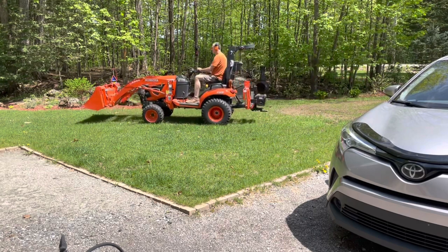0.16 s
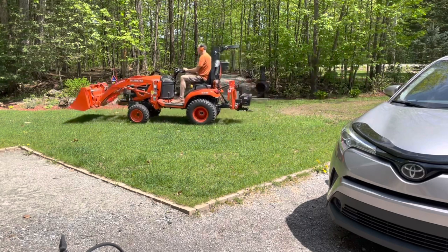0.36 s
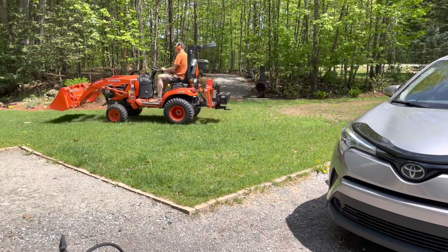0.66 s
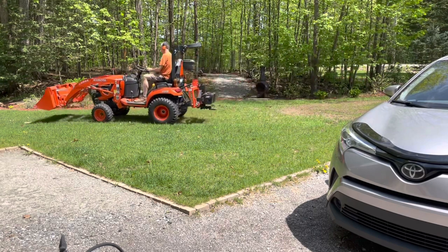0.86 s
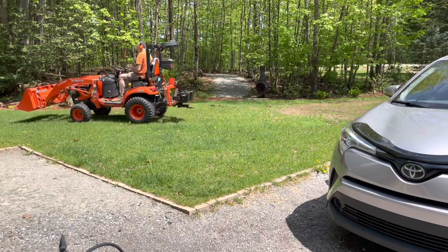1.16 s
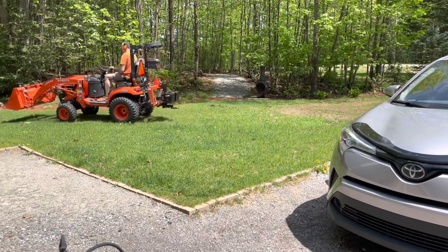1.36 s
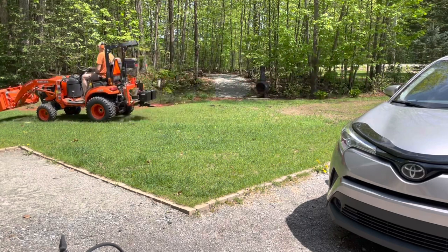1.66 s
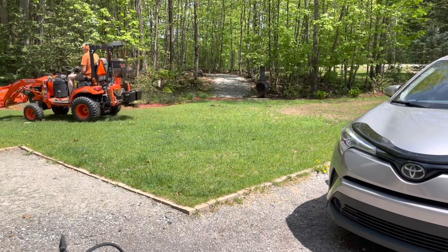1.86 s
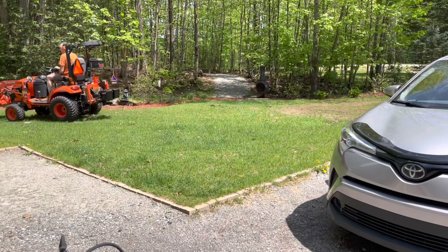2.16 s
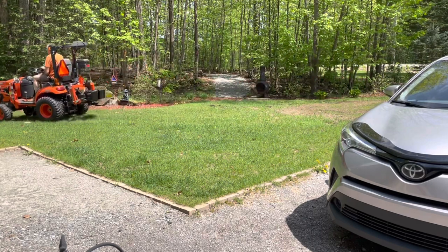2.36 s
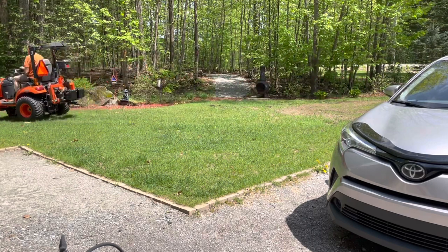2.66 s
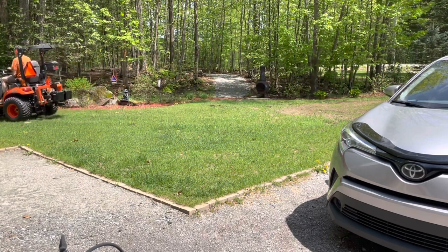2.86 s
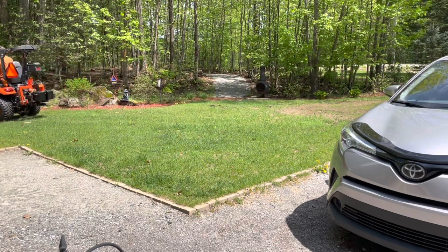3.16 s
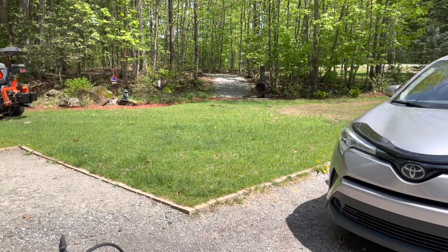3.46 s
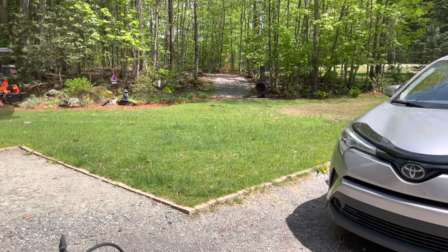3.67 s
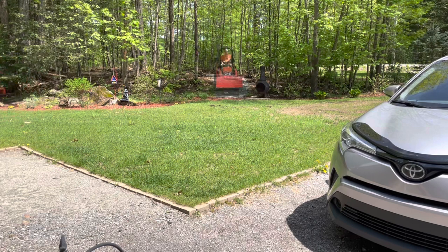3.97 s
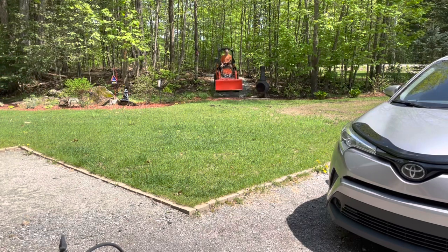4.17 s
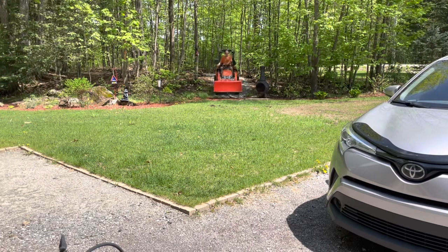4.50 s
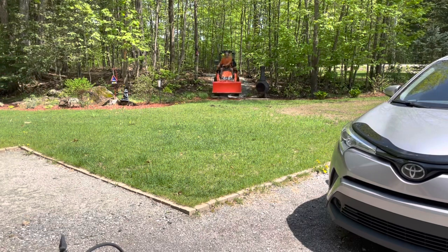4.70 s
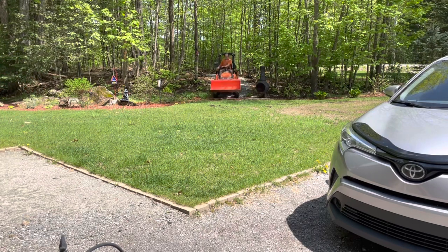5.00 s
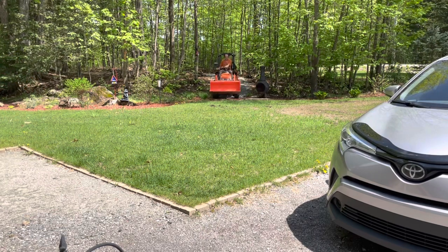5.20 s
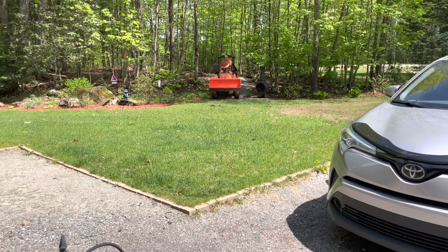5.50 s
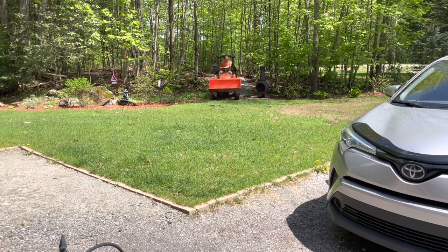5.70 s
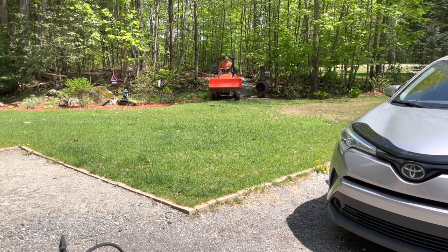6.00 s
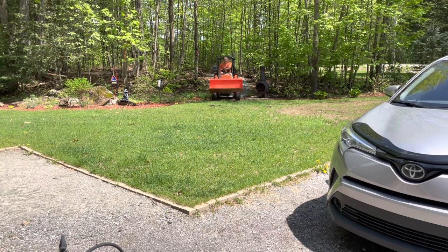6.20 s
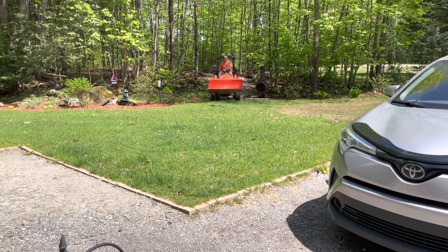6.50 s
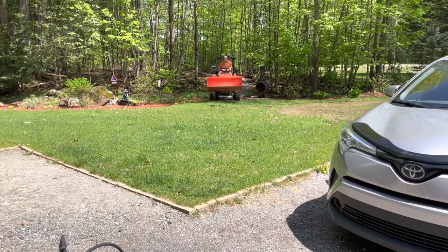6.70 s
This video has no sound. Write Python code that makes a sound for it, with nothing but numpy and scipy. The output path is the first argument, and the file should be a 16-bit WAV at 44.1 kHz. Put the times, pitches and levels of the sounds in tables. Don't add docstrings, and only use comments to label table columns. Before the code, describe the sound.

Outdoors on a lawn, a compact three-cylinder diesel tractor runs at a steady fast putter, with knocking combustion, airy fan rush and thin hydraulic and gear whines. It turns away and fades slightly, the whine becoming clearer. Around four seconds the sound cross-fades to the same engine facing the listener from farther away, duller and softer, with a couple of low linkage thumps. Stereo microphone at a fixed spot in the open air.

```python
import sys
import numpy as np
from scipy import signal
from scipy.fft import rfft, irfft, next_fast_len
from scipy.io import wavfile

SR = 44100
rng = np.random.default_rng(int(sys.argv[2]) if len(sys.argv) > 2 else 0)


def unload_wav(signal):
    wavfile.write(
        sys.argv[1],
        SR,
        np.round(np.clip(np.atleast_2d(signal).T, -1, 1) * 32767).astype(np.int16),
    )


def gain_from_db(level_db):
    decades = np.asarray(level_db, float) / 20
    return 10 ** decades


N = 302071
TIME_S = np.arange(N) / SR

# time_s, side_on_share, behind_share (remainder: afar)
VIEW = [(0, 1, 0), (1.1, 1, 0), (2.3, 0, 1), (3.65, 0, 1), (4.05, 0, 0), (6.85, 0, 0)]
# time_s, cycles_per_s
SPEED = [(0, 19.57), (.25, 19.55), (.5, 19.44), (1, 19.38), (1.25, 19.54), (1.5, 19.44), (2.25, 19.5),
         (2.5, 19.7), (2.75, 19.66), (3, 19.92), (3.25, 20), (3.75, 20), (3.95, 20.42), (4.55, 20.43),
         (4.75, 20.3), (5, 19.91), (5.25, 20.27), (5.5, 20.06), (6, 20.29), (6.25, 20.22), (6.5, 19.77),
         (6.85, 19.65)]
# time_s, level_db, load_db
NEARNESS = [(0, -34, 2.3), (.84, -35, 1.2), (1.22, -35, 1.1), (1.96, -33.5, 0.2), (2.27, -35, 0.9),
            (3.53, -37.5, -1.2), (3.93, -41, 1), (4.04, -37.5, 0.5), (4.3, -37, -0.5), (4.52, -37, 0),
            (4.58, -35.5, 0.5), (4.66, -38, 0.3), (5.4, -37, -3), (6.54, -37, -2.5), (6.85, -34.5, -3.5)]

# time_s, firing_beat_db, octave_over_beat_db
EXHAUST = [(0, -20.5, -2.5), (.6, -25.5, 3), (1.0, -24.5, 3), (1.25, -25, 0.5), (1.8, -24, -3),
           (2.6, -24, -6), (2.8, -27, -2), (3.62, -26.5, -7.5), (3.75, -30.5, -2), (3.9, -45, 11),
           (4.0, -32, 1.5), (4.2, -29, -3.5), (4.8, -31, 0.1), (5.0, -32, 4.5), (5.25, -31, -0.5),
           (5.6, -34, 3), (6.3, -27, -3), (6.85, -37, 12.5)]
BEAT_LEADS = [(1.5, 1.45, 3.7), (3.7, 4.8, 6.2), (-1.8, .2, 4.1)]
# side_on_db, behind_db, afar_db
UPPER_BEATS_DB = [(-8.5, -8, -10), (8, 2, -4.5)]
# cycle_multiple, level_db
LEAVING_ORDERS = [(1, -38), (2, -37), (3, 0), (4, -46), (5, -33), (6, 0), (7, -33), (8, -22.5), (9, -19),
                  (10, -15), (11, -13.5), (12, -6), (13, -27.5), (14, -18.5), (15, -26.5), (16, -26),
                  (17, -36), (18, -48), (19, -27), (20, -28.5), (21, -30), (22, -24.5), (23, -27.5),
                  (24, -29), (25, -26), (26, -35)]
# cycle_multiple, level_db
RETURN_ORDERS = [(1, -35), (2, -28), (3, 0), (4, -21), (5, -14), (6, 0), (7, -12.5), (8, -40), (9, -15),
                 (10, -36), (11, -21), (12, -9), (13, -32), (14, -31), (15, -18), (16, -13), (17, -38),
                 (18, -15.5), (19, -15.5), (20, -14.5), (21, -18), (22, -18), (23, -20.5), (24, -40),
                 (25, -47), (26, -36)]
THIRD_FOLLOWS_LIFT, LOAD_MUFFLES = 0.51, 0.96
TURN_SHADE_DB = -5
SPLICE_S, SPLICE_LEN_S, SPLICE_DIP_DB = 3.7, 0.15, -3
FLAP_ORDER, FLAP_HZ, FLAP_FIRST_S = 11, 4.0, 0.1
FLAP_DB, FLAP_DEPTH_DB = -8, 6

# start_s, length_s, level_db
PUMP = [
    [(0, 0.083, -46), (.4, 0.17, -45), (.9, 0.84, -44), (5.15, 0.18, -51)],
    [(.2, 0.34, -43.5), (.9, 0.4, -47), (1.72, 0.616, -42), (2.35, 0.36, -47.5), (4.4, 0.12, -59),
     (5.15, .2, -65)],
    [(0, 0.5, -43.5), (1.15, 0.5, -46), (1.8, 0.34, -56), (4.15, 0.14, -51), (5.95, 0.77, -59.5)],
    [(0, 0.76, -41), (.8, 0.29, -37), (1.4, 0.87, -48.5), (3.9, .08, -49.5), (4.02, 0.059, -43),
     (4.19, 0.053, -40), (4.38, 0.18, -46.5), (4.58, .06, -49), (4.7, 0.14, -51), (4.94, .07, -46.5),
     (5.13, .12, -54), (5.75, 0.19, -71), (6.4, 0.13, -53), (6.6, 0.2, -50)],
    [(.4, 0.34, -53), (1.4, 0.19, -41.5), (3.97, .06, -51), (4.1, .04, -45), (4.27, 0.065, -45),
     (4.36, .05, -48), (4.48, .04, -52), (4.75, .05, -52), (4.97, 0.25, -53), (6.65, 0.25, -62)],
    [(.2, 0.83, -47.5), (1.45, 0.67, -45.5)],
]
# multiple, side_on_db, behind_db, afar_db
PUMP_HIGH = [(8, -54, -55, -63.5), (9, -67, -72, -72), (10, -56.5, -59, -66), (11, -52, -67, -66),
             (12, -53.5, -75, -82), (16, -69, -62, -92), (20, -61, -67, -69.5)]
PUMP_STROKES = 14
PUMP_REST_DB, PUMP_EDGE_S = (-49, -28, -42), 0.055
# start_s, length_s, pitch_hz, level_db,
# glide_hz_per_s
GEARS = [(2.4, .3, 996, -53, .1), (2.75, .2, 988, -44, 50), (2.95, .97, 1001, -42.5, 1),
         (.55, .7, 1195, -49, 1.5), (1.85, .35, 1197, -51, 3), (1.1, .4, 1495, -46, 3),
         (1.55, .25, 1497, -44, -9), (3.05, .8, 1599, -56, -1), (5.4, .9, 1862, -58, 30),
         (2.55, 1.1, 906, -49, 16), (0, .12, 3003, -48, -20), (.22, .25, 3010, -48, -60),
         (1.03, .16, 2985, -50, 150), (.05, .25, 3110, -51, 200), (1.1, .3, 3060, -54, 150),
         (.15, .2, 2800, -53, 1), (.33, .28, 2722, -47, 1), (2.0, .45, 2710, -55, 40),
         (2.9, .6, 3999, -59, 1.5), (6.6, .25, 1575, -55, 1.5), (5.6, .6, 3033, -60, 9),
         (6.3, .55, 3060, -60, -9), (3.0, .9, 3198, -60, 3), (0, 1.1, 1428, -52, 1), (0, .9, 2240, -55, 1),
         (.8, .45, 2718, -53, 1), (4.15, 1.0, 2508, -59, 5), (6.5, .35, 5285, -63, 1.5),
         (5.1, .25, 937, -55, 1), (5.65, .7, 931, -53, 9), (5.4, .75, 1230, -58, 28),
         (5.9, .5, 1562, -59, 9), (6.6, .25, 885, -53, 9), (6.65, .2, 912, -54, 1),
         (3.95, .65, 1368, -56, -35), (1.5, .35, 2670, -56, 1), (1.15, .4, 4936, -59, 1),
         (.55, .4, 3844, -61, 1), (.6, 1.0, 4305, -60, -9), (3.0, .35, 2245, -61, 1),
         (4.2, .35, 3042, -60, 1), (6.0, .7, 3967, -66, -99),
         (.28, .12, 312, -37, 1), (.85, .35, 506, -43, 1), (2.7, .9, 636, -50, 12), (3.9, .3, 388, -49, 1),
        (4.0, 1.05, 724, -51.5, 48), (4.8, .4, 308, -35, 1), (4.89, .06, 309, -35, 1),
        (5.95, .4, 328, -44, -9)]
GEAR_RISE_S, GEAR_FADE_DB = 0.06, -6

# time_s, pitch_hz, level_db
INTAKE = [(.9, 547.6, -45), (1.3, 599.5, -36.5), (1.62, 603, -35.5), (2.35, 612, -35), (2.6, 617.5, -41),
          (3.1, 613, -42), (3.6, 619, -44), (3.9, 614, -44)]
BREATH_DB = -0.5
# start_s, level_db, pitch_hz, t60_s
BUMPS = [(0.45, -35.5, 2995, 0.73), (4.59, -19, 620, 0.066), (5.222, -15, 139, 0.17), (.49, -25, 500, .2),
         (6.45, -33, 453, 0.63)]
CRACK_DB, CRACK_S = -26.5, 0.012

# freq_hz, density_db_per_hz
SIDE_ON = [(45, -78), (90, -55), (150, -53.5), (200, -61), (300, -62), (450, -59.5), (700, -64.5),
           (1100, -71), (1500, -69.5), (2200, -74), (3100, -72), (3700, -77.5), (5200, -75), (7000, -77.5)]
# freq_hz, density_db_per_hz
BEHIND = [(45, -75), (90, -61.5), (200, -60), (300, -63), (450, -67), (700, -60.5), (1100, -85),
          (1500, -82.5), (2200, -80.5), (3000, -86.5), (3700, -83.5), (4300, -65), (5200, -87), (6300, -87),
          (7000, -85.5)]
# freq_hz, density_db_per_hz
AFAR = [(45, -85), (90, -55.5), (150, -67.5), (200, -59.5), (300, -60.5), (450, -66.5), (700, -64),
        (1100, -85.5), (1500, -83), (2200, -85.5), (3100, -86), (3700, -84.5), (5200, -84), (7000, -88)]
# freq_hz, gain_db
AIR_TOP = [(7000, -0.5), (8300, -.5), (9200, -3), (10000, -8), (12000, -14.5), (13200, -13), (15000, -11.5)]
# freq_hz, likeness
LIKENESS = [(60, .9998), (150, .995), (300, .98), (700, .82), (1500, .72), (3000, .7), (4000, .4),
            (5500, .5), (7000, .7), (7700, .97)]
# side_on_db, behind_db, afar_db
RUSH_DB = [(-1, -4, -3.5), (-1.65, -4, -5), (-9.5, -9, -15.5)]
TURN_HISS_DB = 3.0
GROUND_ECHO, GROUND_LAG_S, GROUND_SWAY_S = 0.13, 0.0015, 0.00004
FAN_AIM_S, FAN_AIM_LEN_S = 2.5, 1.65

# freq_hz, left_lead_rad, left_over_right_db
PORTS_SIDE_ON = [(0, 0, .5), (600, .3, 4), (1300, .2, 2), (3300, 1.2, 1.5), (4200, 0, 4.5), (5200, 1.2, 6),
                 (6100, -.5, 2.5), (7200, -1.6, 1.4), (7800, -3.14, 0), (8850, -3.14, 0), (11250, -6.28, 0),
                 (12100, -6.28, 0), (14300, -9.42, 0)]
# freq_hz, left_lead_rad, left_over_right_db
PORTS_TURNING = [(0, 0, .3), (600, .5, 4.5), (1300, .8, 3), (2400, 1.8, 3.5), (3100, 2.2, 4.5),
                 (3450, 3.1, 4), (3800, 5.5, 1.5), (4300, 6, 2), (4900, 6.4, 5.5), (5500, 6, 3.5),
                 (6200, 5.6, 1.5), (7200, 4.7, 1.5), (7800, 3.14, 0), (8950, 3.14, 0), (11250, 0, 0),
                 (12100, 0, 0), (14300, -3.14, 0)]
# freq_hz, left_lead_rad, left_over_right_db
PORTS_LEFT = [(0, 0, 0), (600, .8, 4.5), (1200, 1.2, 6), (1900, 2.7, 4), (2900, 4.2, 4.5), (3600, 6.1, .5),
              (4300, 6.28, 0), (4700, 6.4, 1), (5200, 6.6, 1.5), (5700, 6.6, 1.5), (6200, 6.2, 1),
              (7200, 4.9, 1.7), (7800, 3.14, 0), (8500, 3.14, 0), (11250, 0, 0), (12100, 0, 0),
              (14300, -3.14, 0)]
# freq_hz, left_lead_rad, left_over_right_db
PORTS_AHEAD = [(0, 0, 0), (400, 0, 3.5), (700, 0, .5), (1330, 0, .5), (1410, 1.1, 2), (1500, .1, .5),
               (3000, .3, 1), (3500, 0, .5), (5600, 0, 1.5), (7200, -1.3, 1), (7800, -3.14, 0),
               (8500, -3.14, 0), (11250, -6.28, 0), (12100, -6.28, 0), (14300, -9.42, 0)]


def rms_one(x):
    return x / np.sqrt(np.mean(x ** 2) + 1e-20)


def in_time(rows):
    time_s, *columns = np.transpose(rows)
    return [np.interp(TIME_S, time_s, c) for c in columns]


def at_hz(points, hz):
    freq_hz, value = np.transpose(points)
    return np.interp(np.log(hz), np.log(freq_hz), value)


def by_view(side_on_value, behind_value, afar_value):
    side_on, behind = in_time(VIEW)
    return side_on * side_on_value + behind * behind_value + (1 - side_on - behind) * afar_value


def swell(start_s, length_s, edge_s):
    t = TIME_S - start_s
    return np.clip(np.minimum(t + edge_s / 2, length_s - t + edge_s / 2) / edge_s, 0, 1)


def drift(rate_hz):
    r = np.exp(-80 * np.pi * rate_hz / SR)
    noise = rng.standard_normal(N // 40 + 2002)
    slow = signal.lfilter([1], [1, -2 * r, r * r], noise)[2000:]
    return np.interp(np.arange(N) / 40, np.arange(len(slow)), rms_one(slow))


def tone(radians, rms_db):
    return np.sqrt(2) * gain_from_db(rms_db) * np.cos(np.float32(radians))


def turns(hz):
    return np.cumsum(hz) / SR


def bandpass(order, edges_hz):
    return signal.butter(order, edges_hz, "band", fs=SR, output="sos")


def knock(cycle, repeat, gate_db, peaky_db):
    size = round(SR / 20)
    bins = np.arange(size // 2 + 1)
    place = (cycle % 1 * size).astype(int)
    peaks = np.minimum(rng.standard_normal((3, len(bins))), 1)
    favoured = gain_from_db(peaky_db * peaks * np.clip(bins / 80, .3, 1))
    patterns = rms_one(irfft(rfft(rng.standard_normal((3, size))) * favoured, size))
    blend = [drift(1.83) for _ in patterns]
    same = sum(b * p[place] for b, p in zip(blend, patterns)) / np.sqrt(sum(b * b for b in blend))
    firing = gain_from_db(gate_db * (np.cos(6 * np.pi * cycle) + 0.057 * np.cos(2 * np.pi * cycle)))
    return rms_one(firing * (np.sqrt(repeat) * same + np.sqrt(1 - repeat) * rng.standard_normal(N)))


def rush(cycle, patchy_db):
    side_on, behind = in_time(VIEW)
    afar = 1 - side_on - behind
    edges_hz = 42.2 * 2 ** np.arange(0, 8.8, 1 / 3)
    sources = [[knock(cycle, .66, 1.5, 5.0), rng.standard_normal(N)] for _ in "ab"]
    hiss = rng.standard_normal((2, 2, N))
    groups, power = np.zeros((3, 2, N)), np.zeros((3, N))
    for k, (low, high) in enumerate(zip(edges_hz, edges_hz[1:])):
        hz = np.sqrt(low * high)
        source = sources[k % 2] if hz < 4400 else hiss[k % 2]
        mid_side = signal.sosfilt(bandpass(2, [low, high]), source)
        colour_db = by_view(*[at_hz(colour, hz) for colour in (SIDE_ON, BEHIND, AFAR)])
        grille_db = (5400 < hz < 6800) * TURN_HISS_DB * np.sqrt(4 * side_on * behind)
        gain = gain_from_db(colour_db + at_hz(AIR_TOP, hz) + grille_db)
        group = int(hz > 900) + int(hz > 3400)
        alike = at_hz(LIKENESS, hz)
        if 3400 < hz < 6500:
            alike = alike + behind * (.9 - alike)
        if 700 < hz < 6500:
            alike = alike + .4 * afar * (1 - alike)
        power[group] += (330 < hz < 7500) * gain ** 2 * (high - low) / (SR / 2)
        scatter = np.sqrt(np.reshape([1 + alike, 1 - alike], (2, -1)) / 2)
        patches = gain_from_db(patchy_db * (drift(15.0) + 0.12 * drift(2.5)))
        groups[group] += gain * patches * scatter * mid_side
    bonnet = signal.butter(4, 3500, fs=SR, output="sos")
    groups[1] = signal.sosfilt(bonnet, groups[1])
    later = np.arange(N) - SR * (GROUND_LAG_S + GROUND_SWAY_S * drift(1.22))
    groups[2] += [GROUND_ECHO * np.interp(later, np.arange(N), g) for g in groups[2]]
    groups[2] /= np.hypot(1, GROUND_ECHO)
    near_db, load_db = in_time(NEARNESS)
    out = 0
    for g, p, row, extra_db in zip(groups, power, RUSH_DB, [0, load_db, 0]):
        out = out + g * gain_from_db(near_db + by_view(*row) + extra_db) / np.sqrt(p)
    return out


def bumps():
    out = np.zeros(N)
    rattle = signal.sosfilt(bandpass(2, [1500, 6000]), rng.standard_normal(N))
    for start_s, db, hz, t60_s in BUMPS:
        t = np.maximum(TIME_S - start_s, 0)
        out += gain_from_db(db - 60 * t / t60_s) * (1 - np.exp(-t / 0.016)) * np.sin(2 * np.pi * hz * t)
        out += gain_from_db(db + CRACK_DB) * t / CRACK_S * np.exp(1 - t / CRACK_S) * rattle
    return out


def intake(cycle):
    hz, db = in_time(INTAKE)
    lowpass = signal.butter(2, 14, fs=SR, output="sos")
    i, q = signal.sosfilt(lowpass, [knock(cycle, 0.71, 0.95, 2.0) for _ in "iq"])
    angle = 2 * np.pi * turns(hz)
    opening, = in_time([(.9, 0.39), (1.1, 0.55), (3.75, 1), (3.95, 0.01)])
    breath_db = BREATH_DB * np.cos(2 * np.pi * cycle)
    return opening * gain_from_db(db + 0.3 + breath_db) * rms_one(i * np.cos(angle) + q * np.sin(angle))


def whines(cycle):
    angle = 2 * np.pi * PUMP_STROKES * cycle

    def throb_db(on=slice(None)):
        return 3.2 * np.cos(2 * np.pi * (cycle[on] + rng.random())) + 1.3 * drift(14)[on]

    out = np.zeros(N)
    rest = gain_from_db(in_time(NEARNESS)[0] + by_view(*PUMP_REST_DB))
    for harmonic, swells in enumerate(PUMP, 2):
        singing = rest + sum(gain_from_db(db) * swell(s, length, PUMP_EDGE_S) for s, length, db in swells)
        out += singing * tone(harmonic * angle + .5 * drift(6), .6 * throb_db() - .5)
    for k, *view_db in PUMP_HIGH:
        out += tone(k * angle + 0.45 * drift(7.1), by_view(*view_db) + 1.8 * drift(2.3) + throb_db())
    for start_s, length_s, hz, db, glide in GEARS:
        first_s, last_s = start_s - GEAR_RISE_S, start_s + length_s + GEAR_RISE_S
        on = slice(max(int(first_s * SR), 0), int(last_s * SR))
        t = (TIME_S - start_s)[on]
        fade_db = GEAR_FADE_DB * (t / length_s) ** 4
        level_db = db + fade_db + throb_db(on) * min(hz / 1200, 1)
        radians = 2 * np.pi * (hz + glide * t / 2) * t + 0.41 * drift(16)[on]
        out[on] += swell(start_s, length_s, GEAR_RISE_S)[on] * tone(radians, level_db)
    return out


def exhaust(cycle):
    angle = 2 * np.pi * cycle
    leads_rad = [0] + [by_view(*row) for row in BEAT_LEADS]
    side_on, behind = in_time(VIEW)
    beat_db, lift_db = in_time(EXHAUST)
    body_db, load_db = in_time(NEARNESS)
    splice_db = SPLICE_DIP_DB * np.exp(-((TIME_S - SPLICE_S) / SPLICE_LEN_S) ** 2)
    upper_db = body_db + splice_db - LOAD_MUFFLES * load_db
    third_db, fourth_db = [upper_db + by_view(*row) for row in UPPER_BEATS_DB]
    shade_db = TURN_SHADE_DB * (4 * side_on * behind) ** 2
    levels_db = [beat_db + 0.45 * drift(5.7),
                 beat_db + lift_db,
                 third_db + THIRD_FOLLOWS_LIFT * lift_db + 1.2 * drift(1.2),
                 fourth_db + shade_db + 0.67 * drift(3.9)]
    out = np.zeros(N)
    for k, (lead, db) in enumerate(zip(leads_rad, levels_db), 1):
        out += tone(3 * k * angle + lead, db)
    leaving = np.clip(side_on + behind, 0, 1)
    flap_db = FLAP_DEPTH_DB * np.cos(2 * np.pi * FLAP_HZ * (TIME_S - FLAP_FIRST_S))
    out += (1 - leaving) * tone(FLAP_ORDER * angle, body_db + FLAP_DB + flap_db)
    for (k, leaving_db), (_, return_db) in zip(LEAVING_ORDERS, RETURN_ORDERS):
        if k % 3 or k > 12:
            db = leaving * (leaving_db + 7.5) + (1 - leaving) * (return_db + 1.5) + body_db
            radians = k * angle + 2 * np.pi * rng.random() + .4 * drift(2.5)
            out += tone(radians, db + 1.6 * drift(2.5))
    return out


def scene():
    cycle = turns(*in_time(SPEED))
    shared, scattered = rush(cycle, patchy_db=1.42)
    fan_core = signal.sosfiltfilt(bandpass(2, [3500, 4100]), scattered)
    scattered = scattered - swell(FAN_AIM_S, FAN_AIM_LEN_S, .15) * fan_core
    direct = shared + bumps() + intake(cycle) + whines(cycle) + exhaust(cycle)
    return np.array([direct + scattered, direct - scattered])


def ports(dry, table):
    size = next_fast_len(N)
    hz = np.arange(size // 2 + 1) * SR / size
    freq_hz, lead_rad, diff_db = np.transpose(table)
    half = gain_from_db(np.interp(hz, freq_hz, diff_db) / 2)
    lag = np.exp(-1j * np.interp(hz, freq_hz, lead_rad))
    return irfft(rfft(dry, size) * [half, lag / half], size)[:, :N]


def roll_off(x):
    return signal.sosfilt(signal.butter(12, 15720, fs=SR, output="sos"), x)


def record(dry):
    side_on, behind = in_time(VIEW)
    half_way = np.minimum(side_on, behind)
    shares = [side_on - half_way, 2 * half_way, behind - half_way, 1 - side_on - behind]
    tables = [PORTS_SIDE_ON, PORTS_TURNING, PORTS_LEFT, PORTS_AHEAD]
    heard = sum(share * ports(dry, table) for share, table in zip(shares, tables))
    return roll_off(heard)


dry = scene()
out = record(dry)
unload_wav(out)
```